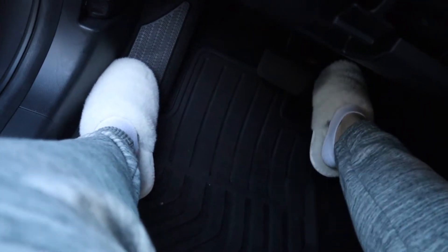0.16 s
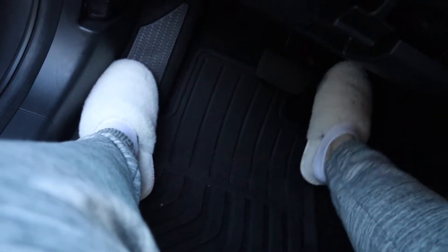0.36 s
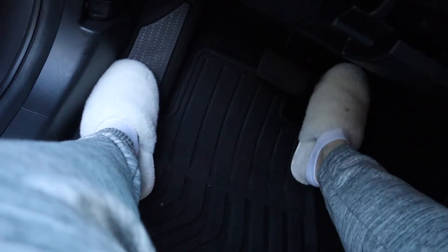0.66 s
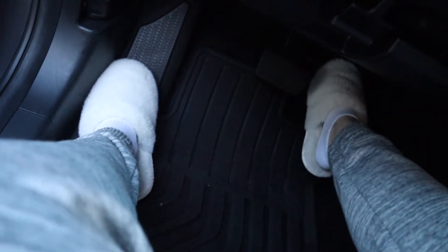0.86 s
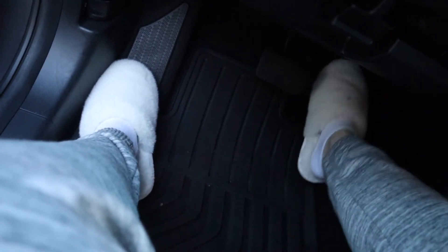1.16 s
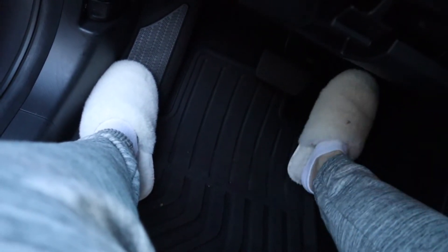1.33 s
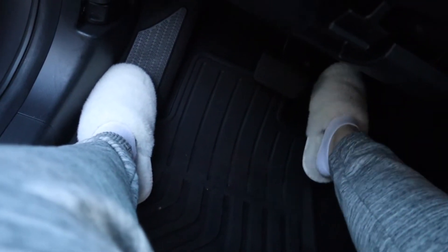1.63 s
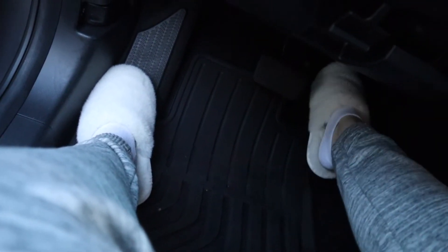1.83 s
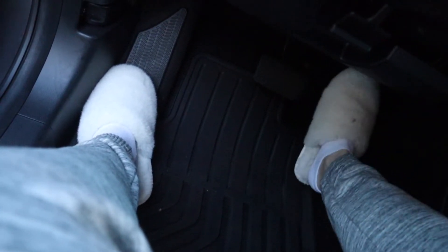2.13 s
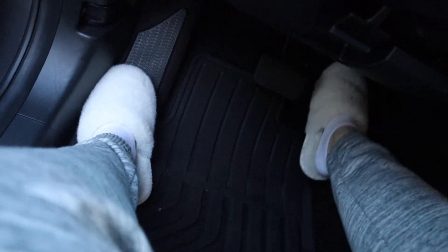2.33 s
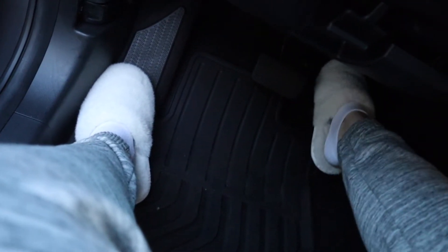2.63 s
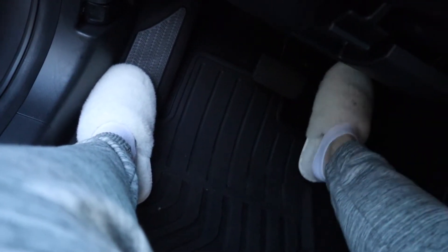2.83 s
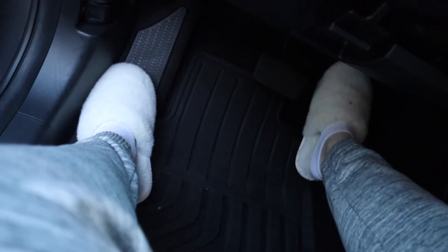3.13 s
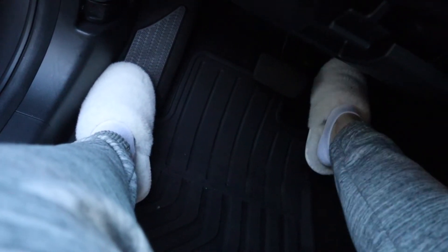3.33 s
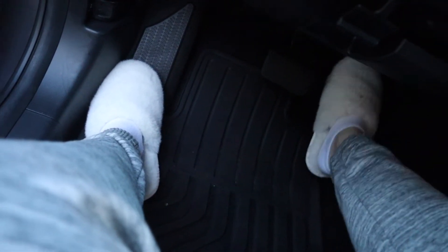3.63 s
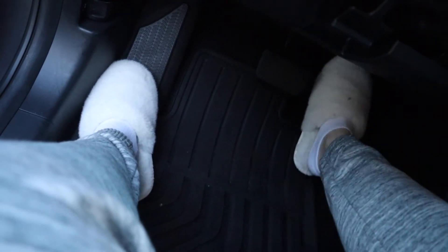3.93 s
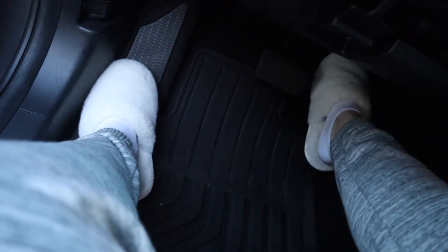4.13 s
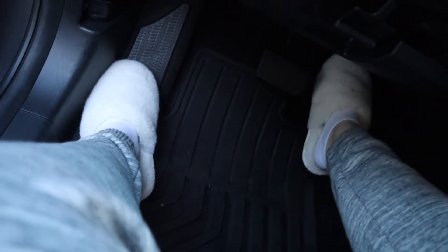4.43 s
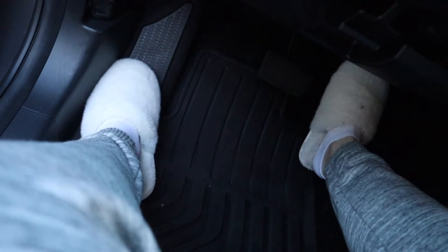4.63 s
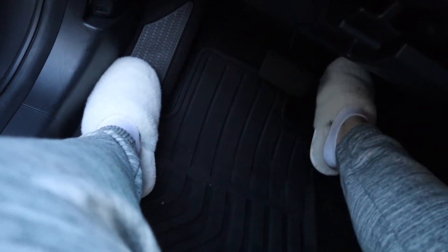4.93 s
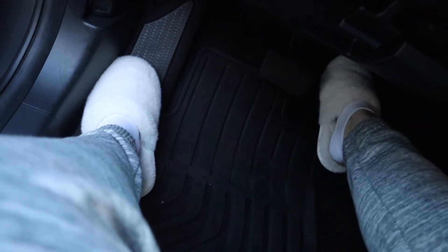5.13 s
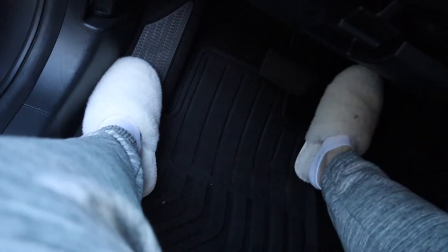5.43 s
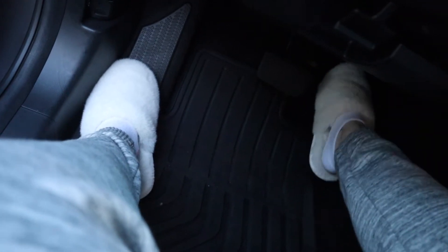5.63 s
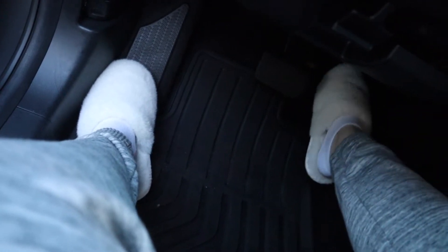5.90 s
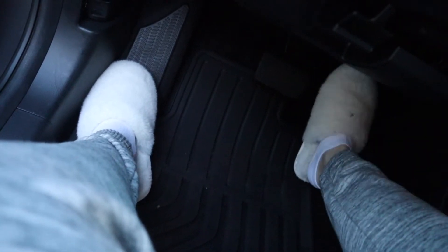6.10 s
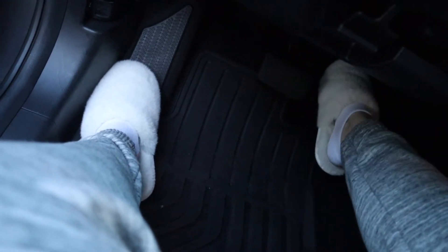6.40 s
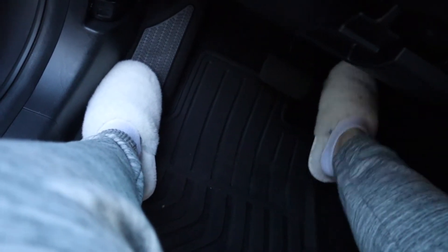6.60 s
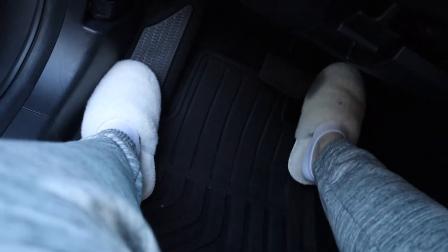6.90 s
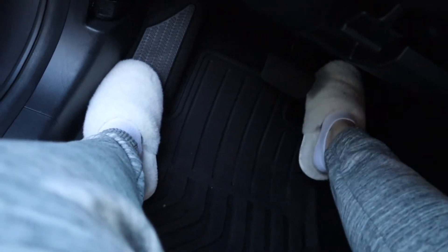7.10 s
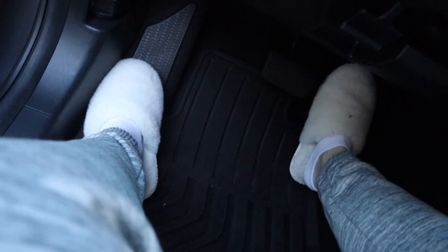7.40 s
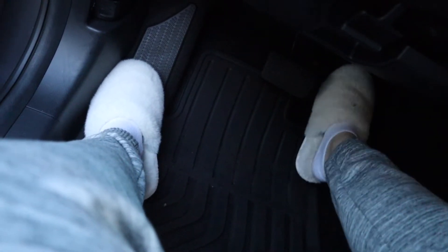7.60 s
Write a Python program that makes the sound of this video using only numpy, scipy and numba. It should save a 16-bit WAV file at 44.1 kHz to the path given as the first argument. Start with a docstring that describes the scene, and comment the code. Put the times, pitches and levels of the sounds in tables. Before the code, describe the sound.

A quiet idling rumble and soft fan hiss rise at once in a close, dry car interior. A slippered foot slams a pedal down at 0.4 and 1.2 seconds, giving deep, hollow thumps with a hard panel knock and brief rattle. Softer, duller thumps follow at 2.1, 2.9, 3.7 and 4.5. Strong ones return, faster, at 5.3, 6.0, 6.7 and 7.3. After each, about 0.2 to 0.25 seconds later, the pedal springs back with a short bright plastic click and low clack; the last two are duller and weaker. Tiny woolly rubs barely show. Tyre hiss outside swells gently around 1.9, with a faint rustle, and rises again toward the end. A faint low drone wavers and creeps upward from about 1.6 to 4.5. The loudest thumps momentarily push the background down.

```python
"""Slippered thumps on a car's floor panel, each answered by the pedal's snap against its plastic stop.
The car is parked: its engine idles as shaped noise, a fan hisses, tyre hiss swells outside, a drone drifts by.
Thumps and snaps are struck banks of decaying modes with noise bursts; the drone is a wavering sine.
A close stereo microphone turns its gain down after the loudest thumps."""
import sys
import numpy as np
from scipy.fft import rfft, irfft, next_fast_len
from scipy.io import wavfile
from scipy.ndimage import map_coordinates
from numba import njit

SR = 44100
rng = np.random.default_rng(int(sys.argv[2]) if len(sys.argv) > 2 else 0)


def store_pcm(level_fs):
    """Save levels as 16-bit WAV."""
    pcm = np.round(np.clip(level_fs, -1, 1) * 32767).astype(np.int16)
    wavfile.write(sys.argv[1], SR, np.atleast_2d(pcm).T)


N = 341775  # length in samples

# The pedal reaches the floor. Each row: time in seconds, blow strength in dB, panel ring in dB.
PEDAL_PRESSES = [(0.4276, 4, -8.5), (1.2401, 4.5, -6), (2.06, -1.8, -17.5), (2.8828, -5.5, -21.5),
                 (3.7073, -9, -28), (4.5473, -10, -28.5), (5.3278, 4, -7), (6.012, 1, -13),
                 (6.6677, 3.5, -12.5), (7.3434, 3.1, -10.5)]
# The pedal snaps back. Each row: time in seconds, then bracket boom, lever clack, stop click
# and snap noise, all in dB.
PEDAL_RETURNS = [(0.678, -13.5, -18, -21, -25), (1.494, -16, -15, -9, -15),
                 (2.3039, -10.5, -16.5, -10.5, -16), (3.1313, -15, -16.5, -12, -17),
                 (3.9437, -12, -14, -10, -16), (4.802, -10.5, -16.5, -13.5, -16),
                 (5.5234, -11, -17, -12.5, -18.5), (6.2052, -11.5, -12, -12, -24),
                 (6.8626, -17, -21, -39, -23.5), (7.5284, -18, -21.5, -32, -28)]
# The slipper rubs on the mat. Each row: middle in seconds, length in seconds, level of the side in dB.
SLIPPER_RUBS = [(0.388, 0.031, -46), (1.174, 0.015, -55), (1.966, 0.018, -53), (2.09, 0.027, -46.5),
                (3.655, 0.033, -55), (5.3, 0.032, -49), (5.981, 0.052, -52), (7.02, .015, -56.5),
                (7.318, 0.046, -54.5), (7.536, .045, -50), (7.65, 0.019, -49.5)]
# Cars passing. Each row: nearest moment in seconds, tyre hiss in dB, seconds from there to half strength.
CAR_PASSES = [(1.9, -40.5, 1.51), (8, -39.5, 0.69)]

# Struck parts, as banks of modes: the floor under the pedal, the panel, the bracket, the lever, the stop.
# Each row: frequency in Hz, level in dB, t60 in seconds, side relative to mid in dB, signed weight.
FLOOR_MODES = [(180, -10.5, .11, -36, 1), (229, -3, .09, -24, 1), (297, -14.5, .137, -27, 1),
               (352, -4, .021, -28, 1), (357, -35, .5, -15, -1), (585, -3.5, .019, -16, 1),
               (760, -9.5, .018, -16, 1)]
PANEL_MODES = [(684, -8, 0.075, -25, -1.28), (914, -12.5, 0.076, -18, 0.67), (1020, -2, 0.025, -8, 0.91),
               (1250, -5, 0.024, -4, 0.83), (1530, -20, 0.023, -12, -0.67), (2140, -21, 0.016, 2, 0.68),
               (2680, -21, 0.03, 3, 0.68), (3270, -24, 0.018, -6, -1.1)]
BRACKET_MODES = [(93, -10, 0.4, -46, 0.6), (128.5, 2.5, 0.086, -47, -0.84), (173.8, -2.5, 0.118, -36, 0.74),
                 (216, -8, 0.061, -30, 0.41), (276, -14.5, 0.12, -22, 0.58), (394, -16, 0.096, -18, -0.39)]
LEVER_MODES = [(556, -1, 0.033, -25, -0.54), (783, 3, 0.01, -24, 1), (1305, 2.3, 0.0071, -6, -1.62),
               (2010, -7, 0.032, -8, 0.57), (2660, -17.5, 0.035, 5, -1.24)]
STOP_MODES = [(2330, -17, 0.0065, 2, -0.77), (3210, -13.5, 0.022, 3, 0.95), (3580, -8.5, 0.017, 2, 0.5),
              (4060, 0, 0.018, 3.4, -0.62), (4600, -12, 0.011, 2, 0.96), (5270, -2.5, 0.0055, 2.2, -1.4),
              (5580, -7, 0.0052, 2, 1), (6870, -9, 0.0062, 3.7, 0.75), (8060, -10.5, 0.0094, 4, -0.65),
              (10100, -22, 0.0034, 5, 0.6)]
# Single modes with the same columns: the floor's lowest mode, the cabin air, the mat's thud
# (whose t60 is for a 0 dB blow).
DEEP_MODE = [(99, -16, .3, -50, 1)]
AIR_MODE = [(114, -21, .45, -45, 1)]
MAT_MODE = [(136, 2.5, .07, -36, -1)]

# Noise colours: engine rumble and the cabin boom inside it, fan hiss in mid and side, tyre hiss,
# slipper wool, the knock on the mat, loose trim, the snap's crack, the rustle.
# Each row: frequency in Hz, relative density in dB per Hz.
RUMBLE_COLOUR = [(12, -66), (20, -48), (36, -10.5), (107, -1), (129, -6), (147, -3), (183, -7), (416, -21),
                 (450, -17), (580, -17), (990, -120)]
BOOM_COLOUR = [(90, -17), (112, 8), (118, 32), (124, -5), (150, -87)]
FAN_MID_COLOUR = [(210, -4), (350, 1.5), (367, 1), (396, -8), (653, 7), (739, 4), (1030, 2), (3680, -14.5),
                  (10600, -57.5), (12000, -32), (13000, -132), (14500, -75)]
FAN_SIDE_COLOUR = [(35, -65), (60, -13.5), (134, -18), (165, -1.5), (249, -10.5), (280, -6.5), (404, -7),
                   (1220, -7), (2430, -12.5), (11100, -23.5), (14600, -31)]
TYRE_COLOUR = [(500, -29), (1200, 6), (2300, 5.5), (4000, 5), (7000, -5), (11000, -10), (13000, -31)]
WOOL_COLOUR = [(1500, -1), (2600, -6), (3500, 0), (4200, 6), (5000, 0.5), (7000, -2.5), (10000, -6.5),
               (13000, -16)]
KNOCK_COLOUR = [(400, -35), (1000, 19), (1500, 12), (2000, 6), (2800, 1), (4000, -2), (7000, -13.5),
                (11000, -16), (13000, -34)]
TRIM_COLOUR = [(380, -46), (520, 18.5), (720, 8), (1100, 2), (1600, -14.5), (2500, -49)]
CRACK_COLOUR = [(400, -37), (1000, 11), (2300, -4.5), (4000, 7.5), (5500, 4), (8000, -6), (11000, -11),
                (14000, -28)]
RUSTLE_COLOUR = [(700, -30), (1300, -5), (1800, 3), (2400, 0), (3200, -15), (6000, -20)]

ENGINE_DB, FAN_DB = -37, -44.5
PASS_RUMBLE_DB, PASS_HISS_DB = -9, -6.5  # a passing car's rumble and broad hiss, relative to its tyre hiss
RISE_DB, RISE_S = -6, 0.22  # the background begins low and comes up

# dB of ring per dB of blow: hard blows wake the deep mode most and hardly raise the mat's thud
FLOOR_GROWS, MAT_GROWS, DEEP_GROWS, AIR_GROWS = 0.85, 0.2, 1.7, 0.4
MAT_LASTS = 0.6  # dB of t60 per dB of blow: hard blows ring the mat longer
CONTACT_S, CONTACT_SHRINKS = 0.0026, 0.38  # rise of a 0 dB blow; shorter by this many dB per dB of blow
KNOCK_DB, RATTLE_DB = -14.5, -14  # relative to the panel ring
STOP_LEAN = -0.57  # the stop sits right of centre: share of its mid added to the side

DRONE_START_S, DRONE_END_S, DRONE_FADE_DB_PER_S = 1.63, 4.5, 53  # it fades before the start, after the end
DRONE_HZ, DRONE_CLIMB_HZ, CLIMB_MIDDLE_S, CLIMB_S = 163.8, 13, 2.7, 0.617  # pitch climbs in an S-bend
DRONE_DB, DRONE_PEAK_S, DRONE_SAG_DB = -33, 3.2, 1.7  # sag one second from the peak, growing as the square
DIP_S, DIP_DB, DIP_WIDTH_S = 3.3, -7.5, 0.17  # the drone dips briefly
ROUGH_S = 3.35  # for one second from here its pitch wavers more and more, then stays rough

RUSTLE_S, RUSTLE_DB, RUSTLE_HALF_S = 1.92, -44.5, 0.093


def amp(db):
    """Turn dB into a linear gain."""
    return 10 ** (np.asarray(db) / 20)


def wobble(rate):
    """A smooth random curve, rate knots a second."""
    knots = rng.standard_normal(int(N * rate / SR) + 4)
    return map_coordinates(knots, [np.arange(N) * rate / SR])


def noise(colour):
    """Noise of the given colour, rms 1."""
    m = next_fast_len(N)
    hz, db = np.transpose(colour)
    gain = amp(np.interp(np.log(np.fft.rfftfreq(m, 1 / SR) + 1), np.log(hz), db))
    gain /= np.sqrt(np.mean(gain ** 2))
    return irfft(rfft(rng.standard_normal(m)) * gain, m)[:N]


def ring(modes, scatter_db, rise):
    """One blow on a bank of modes as (mid, side); each mode's side runs a quarter cycle behind."""
    hz, db, t60, side_db, weight = np.transpose(modes)[:, :, None]
    t = np.arange(SR // 2) / SR
    scattered_db = db + scatter_db * rng.standard_normal(db.shape)
    onset = (1 - np.exp(-t / rise)) ** 2
    fade = weight * amp(scattered_db - 60 * t / t60) * onset
    turn = 2 * np.pi * hz * t
    mid = np.sum(fade * np.sin(turn), 0)
    side = -np.sum(amp(side_db) * fade * np.cos(turn), 0)
    return np.array([mid, side])


def add(track, s, sound):
    """Mix a two-channel sound in at time s."""
    track[:, round(s * SR):][:, :sound.shape[1]] += sound


def passing_cars():
    """Tyre strength of the passing cars, each swelling and falling away around its nearest moment."""
    t = np.arange(N) / SR
    return sum(amp(db) / (1 + ((t - s) / half) ** 2) for s, db, half in CAR_PASSES)


def engine_rumble(cars):
    """Low noise nearly alike on both sides; the cabin air booms at one pitch inside it."""
    level = np.hypot(amp(ENGINE_DB), amp(PASS_RUMBLE_DB) * cars) * amp(1.2 * wobble(5.3))
    return level * (noise(RUMBLE_COLOUR) + amp(-12) * noise(BOOM_COLOUR)) * amp([[0], [-35]])


def fan_hiss(cars):
    """Broad hiss from separate mid and side noises, lifted by the cars; the treble leans to the side."""
    level = np.hypot(amp(FAN_DB), amp(PASS_HISS_DB) * cars) * amp(0.56 * wobble(6))
    return level * [noise(FAN_MID_COLOUR), amp(-0.5) * noise(FAN_SIDE_COLOUR)]


def tyre_hiss(cars):
    """Bright flickering hiss that swells with each passing car, stronger in the side than the mid."""
    return cars * amp(0.7 * wobble(27)) * [amp(-5) * noise(TYRE_COLOUR), noise(TYRE_COLOUR)]


def slipper():
    """Short woolly swishes as the foot slides, grainy from catching fibres."""
    t = np.arange(N) / SR
    stroke = sum(amp(db) * np.exp(-(2 * (t - s) / length) ** 2) for s, length, db in SLIPPER_RUBS)
    grain = amp(2.5 * wobble(350))
    return stroke * grain * [amp(5) * noise(WOOL_COLOUR), noise(WOOL_COLOUR)]


def pedal_presses():
    """Each blow rings floor, mat, cabin air and panel, with a knock and rattle of decaying noise."""
    rings, knock, rattle = np.zeros((3, 2, N + SR))
    t = np.arange(SR // 5) / SR
    for s, blow_db, panel_db in PEDAL_PRESSES:
        mat = np.multiply(MAT_MODE, [1, 1, amp(MAT_LASTS * blow_db), 1, 1])
        contact = CONTACT_S * amp(-CONTACT_SHRINKS * blow_db)  # harder blows rise faster
        parts = [(FLOOR_MODES, FLOOR_GROWS), (mat, MAT_GROWS), (DEEP_MODE, DEEP_GROWS), (AIR_MODE, AIR_GROWS)]
        for modes, grows in parts:
            add(rings, s + 0.0004, amp(grows * blow_db) * ring(modes, scatter_db=0.6, rise=contact))
        add(rings, s - 0.0006, amp(panel_db) * ring(PANEL_MODES, scatter_db=1.2, rise=0.0006))
        # the pedal bites the mat
        add(knock, s - 0.0008, amp(panel_db + KNOCK_DB - 60 * t / 0.067) * amp([[-1.5], [1.5]]))
        # loose trim shakes on
        add(rattle, s + 0.00065, amp(panel_db + RATTLE_DB - 60 * t / 0.15) * amp([[0], [-7]]))
    knocks = knock[:, :N] * [noise(KNOCK_COLOUR), noise(KNOCK_COLOUR)]
    rattles = rattle[:, :N] * [noise(TRIM_COLOUR), noise(TRIM_COLOUR)]
    return rings[:, :N] + knocks + rattles


def pedal_returns():
    """Each snap rings stop, lever and bracket, with a crack of noise that decays at two speeds."""
    rings, crack = np.zeros((2, 2, N + SR))
    t = np.arange(SR // 5) / SR
    for s, boom_db, clack_db, click_db, snap_db in PEDAL_RETURNS:
        add(rings, s + 0.0016, amp(boom_db) * ring(BRACKET_MODES, scatter_db=4.3, rise=0.00055))
        add(rings, s + 0.001, amp(clack_db) * ring(LEVER_MODES, scatter_db=1, rise=0.00036))
        click = ring(STOP_MODES, scatter_db=2.6, rise=0.00025)
        leaning_click = click + [[0], [STOP_LEAN]] * click[0]
        add(rings, s + 0.0008, amp(click_db) * leaning_click)
        # the footwell scatters the click
        scatter = amp(snap_db - 2 - 60 * t / 0.039) + amp(snap_db - 3 - 60 * t / 0.0057)
        scatter *= 1 - np.exp(-t / 0.00052)
        add(crack, s + 0.0011, scatter * amp([[-3], [0]]))
    return rings[:, :N] + crack[:, :N] * [noise(CRACK_COLOUR), noise(CRACK_COLOUR)]


def drone():
    """A low sine that creeps upward and wavers in strength and pitch."""
    t = np.arange(N) / SR
    hz = DRONE_HZ + DRONE_CLIMB_HZ * (1 + np.tanh((t - CLIMB_MIDDLE_S) / CLIMB_S)) / 2
    waver_hz = (1.1 + 3 * np.clip(t - ROUGH_S, 0, 1)) * wobble(35)
    turn = 2 * np.pi * np.cumsum(hz + waver_hz) / SR
    db = DRONE_DB - DRONE_SAG_DB * (t - DRONE_PEAK_S) ** 2
    db += DIP_DB * np.exp(-((t - DIP_S) / DIP_WIDTH_S) ** 2)
    outside_s = np.maximum(0, np.maximum(DRONE_START_S - t, t - DRONE_END_S))
    db -= DRONE_FADE_DB_PER_S * outside_s
    return amp(db + 1.8 * wobble(11)) * [np.sin(turn), amp(-18.5) * np.cos(turn)]


def rustle():
    """A brief flickering swell of upper-middle noise, equally strong in mid and side."""
    t = np.arange(N) / SR
    level = amp(RUSTLE_DB + 2.2 * wobble(40.4)) / (1 + ((t - RUSTLE_S) / RUSTLE_HALF_S) ** 2)
    return level * [noise(RUSTLE_COLOUR), noise(RUSTLE_COLOUR)]


def scene():
    """Lay the foot and drone over the rising background, then turn mid and side into left and right."""
    cars = passing_cars()
    background = engine_rumble(cars) + fan_hiss(cars) + tyre_hiss(cars) + rustle()
    background *= amp(RISE_DB * np.exp(-np.arange(N) / SR / RISE_S))
    mid, side = background + slipper() + pedal_presses() + pedal_returns() + drone()
    return np.array([mid + side, mid - side])


@njit
def ducking(excess_db, attack, release):
    """Gain cut in dB that follows the excess quickly and lets go slowly."""
    cut, out = 0.0, np.empty_like(excess_db)
    for i in range(len(out)):
        cut += (excess_db[i] - cut) * (attack if excess_db[i] > cut else release)
        out[i] = cut
    return out


def record(dry):
    """Gain control pulls both channels down after loud peaks; the microphone then limits the band."""
    level_db = 20 * np.log10(np.max(np.abs(dry), 0) + 1e-9)
    excess_db = np.maximum(level_db + 7, 0)
    cut_db = ducking(0.49 * excess_db, 1 / (0.0003 * SR), 1 / (0.5 * SR))  # attack 0.3 ms, release 0.5 s
    wet = np.clip(dry * amp(-cut_db), -1, 1)
    m = next_fast_len(N + 8192)
    hz = np.fft.rfftfreq(m, 1 / SR)
    capsule = 1 / (1 + (hz / 13300) ** 24)  # the microphone fades at the very top
    return irfft(rfft(wet, m) * capsule * (hz < 14700), m)[:, :N]  # nothing is kept above 14.7 kHz


dry = scene()
out = record(dry)
store_pcm(out)
```